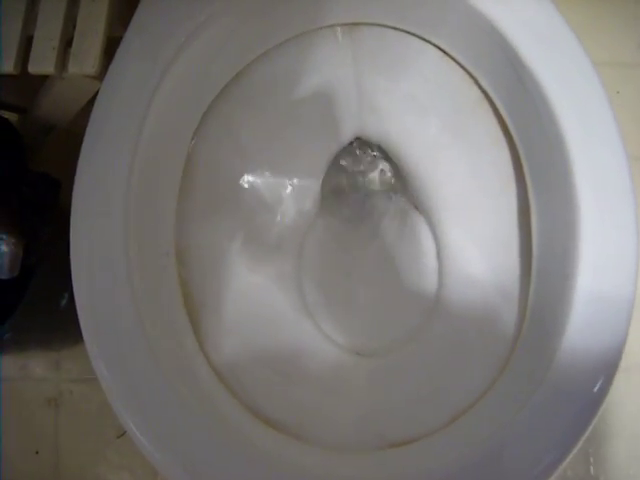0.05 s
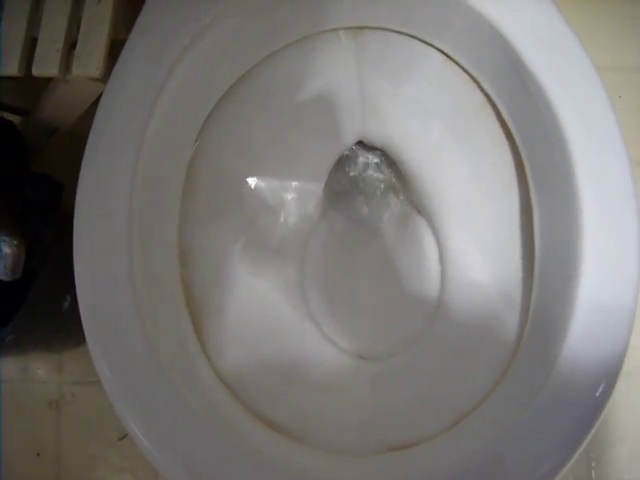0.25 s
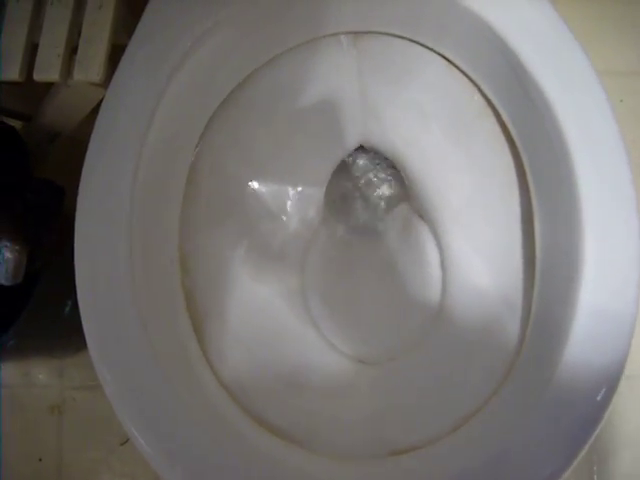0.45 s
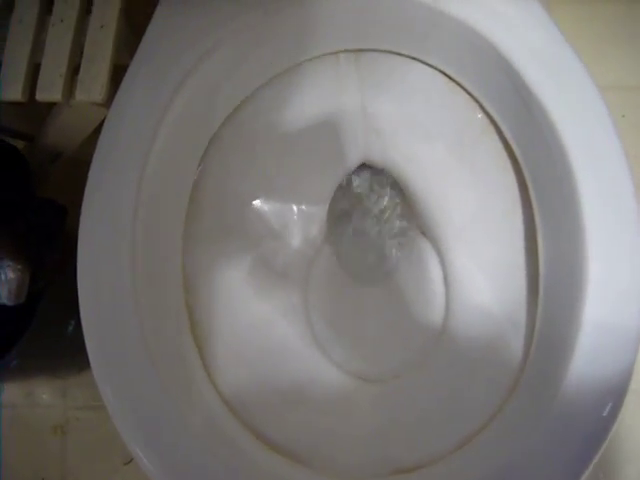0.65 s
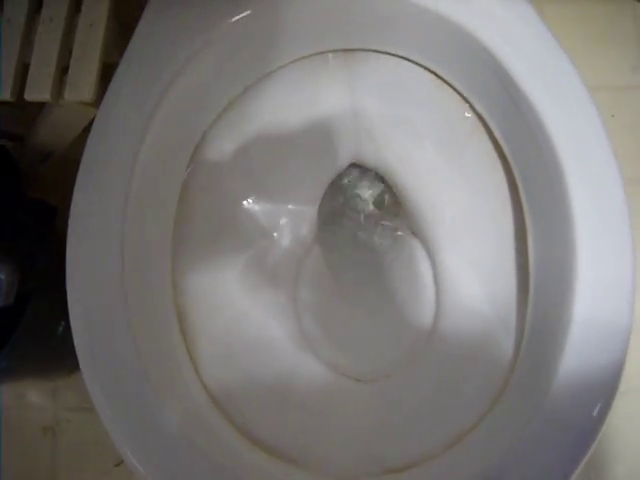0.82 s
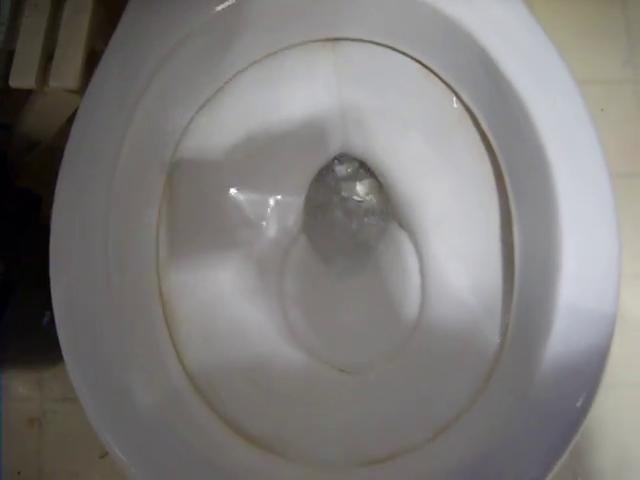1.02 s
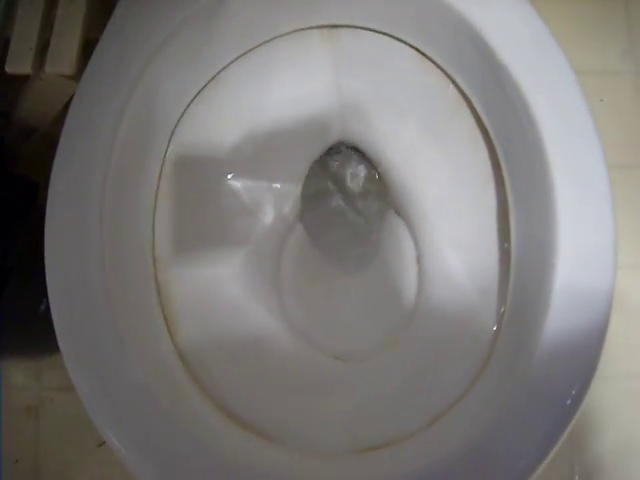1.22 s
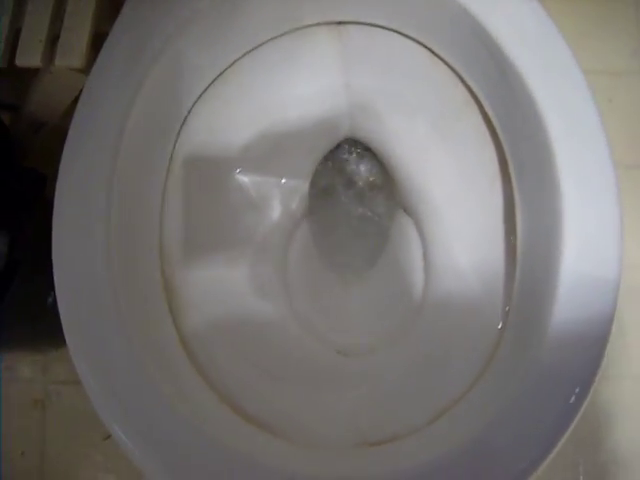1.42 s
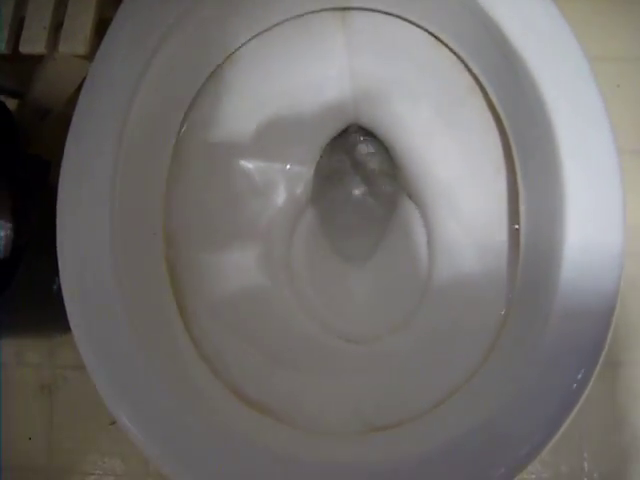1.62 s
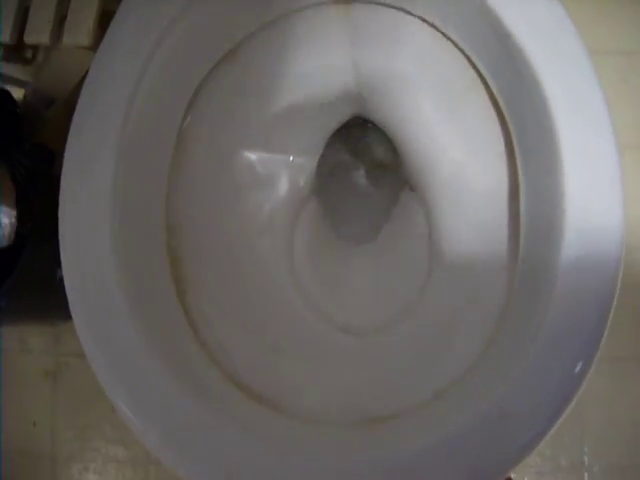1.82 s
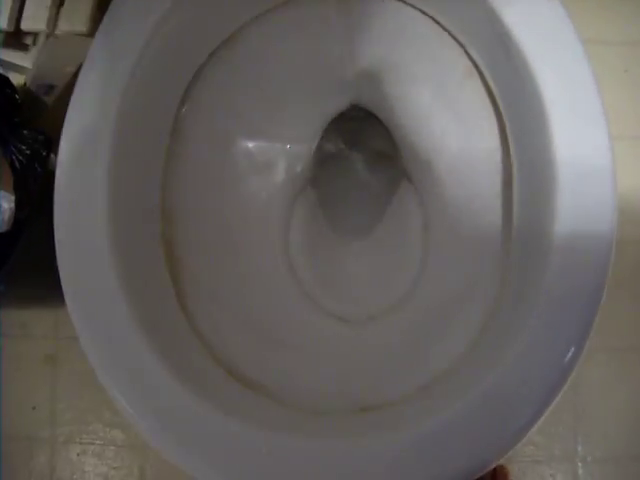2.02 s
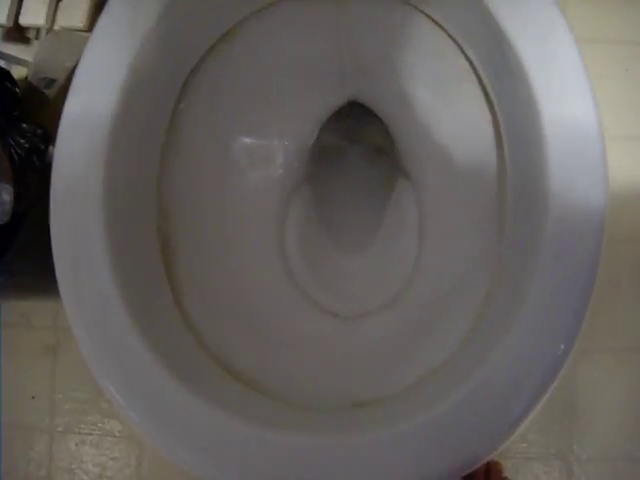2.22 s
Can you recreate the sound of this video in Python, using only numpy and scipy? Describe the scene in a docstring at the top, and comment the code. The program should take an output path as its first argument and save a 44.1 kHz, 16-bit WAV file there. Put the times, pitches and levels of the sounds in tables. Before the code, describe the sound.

Steady hiss of a toilet refilling as the drain glugs, knocks and drips.

```python
"""A toilet tank refilling

In a small bathroom the valve's jet hisses steadily through the air resonances of the hollow tank,
over a faint hum. The last of the flush glugs in the drain as large bubbles ring, and water in the trap
knocks twice, softly and then hard, exciting the bowl's modes. Drips and small bubbles thin out and stop."""
import sys
import numpy as np
from scipy import signal
from scipy.fft import rfft, irfft
from scipy.io import wavfile
from scipy.ndimage import uniform_filter1d

SR = 44100
rng = np.random.default_rng(int(sys.argv[2]) if len(sys.argv) > 2 else 0)


def store_wav(level_fs):
    """Save 16-bit WAV to argv[1]."""
    pcm = np.round(np.clip(np.atleast_2d(level_fs), -1, 1) * 32767)
    wavfile.write(sys.argv[1], SR, pcm.T.astype(np.int16))


N = 103635

# Reverberation of the bathroom. Each row: frequency in Hz, time to fall 60 dB (t60) in seconds.
ROOM_DECAY = [(150, 0.91), (400, 0.26), (1000, 0.38), (3000, 0.09)]
# Spectrum of the valve's jet. Each row: frequency in Hz, relative spectral density in dB.
JET_SPECTRUM = [(20, -12), (45, -15), (78, 1.5), (110, -11.5), (260, -7.5), (390, -1.5), (560, -5.5),
                (820, -0.5), (1010, -3.5), (1120, -7), (1450, -10.5), (1750, -6.5), (2000, -8.5),
                (2900, -4), (3350, -9), (3780, -12), (4000, -28), (4400, -30.5)]
# Air resonances of the tank. Each row: centre in Hz, width in Hz, relative peak density in dB.
TANK_MODES = [(169.4, 32.3, 1.5), (380, 50, -1), (481, 7.2, 9), (781.4, 23, 8.5), (860, 26, 5.5),
              (916, 21, 7.5), (981, 18, 7), (1022, 8, 6.5), (1611, 16, 2.5), (2546, 8.7, 3), (2806, 20, -1),
              (3037, 29, 2)]
# Swell of the tank's strongest, hollow band. Each row: time in seconds, gain in dB.
HOLLOW_SWELL = [(1.24, 0), (1.35, 4), (1.45, 0.5), (1.739, 0), (1.95, -0.7), (2.22, 2), (2.28, -2)]
# Water still running into the bowl. Each row: time in seconds, gain in dB.
TRICKLE_FLOW = [(0, 5), (.06, -1), (.14, -9), (.3, -4.5), (.49, -8.5), (.535, 1.5), (0.621, -3),
                (0.681, -6), (.76, -4), (.98, -8.5), (1.15, -14.5), (1.501, -13), (2.35, -46.5)]
# Colour of that trickle. Each row: bubble pitch in Hz, relative level in dB.
TRICKLE_SPECTRUM = [(200, -20), (550, 5.5), (900, -1), (1450, -2), (2200, -1), (3700, 1), (4300, -40.5)]
# Drips. Each row: start in seconds, pitch in Hz, level in dB, cycles of ringing to fall to 1/e.
DRIPS = [(.0238, 2360, -23.5, 2.6), (.3301, 2274, -33.5, 4.6), (0.5014, 2150, -21.5, 1.8),
         (0.5002, 1100, -25.5, 2.66), (0.5215, 2564, -28.5, 3.1), (.5292, 2095, -29, 4),
         (.571, 2250, -31.5, 4.5), (0.6037, 1900, -34, 4.1), (0.622, 2384, -27, 3.6),
         (0.6329, 2390, -28.5, 4.5), (0.643, 2000, -29.5, 3.8), (.672, 3600, -29.5, 7.6),
         (.6818, 3510, -22.5, 8.5), (0.8415, 2470, -31.5, 3.3), (.862, 3550, -35.5, 15),
         (0.9516, 3100, -33, 8), (0.9663, 2144, -31.5, 9), (1.005, 3590, -34.5, 14), (1.1234, 2115, -30, 7)]
# Large bubbles in the drain. Each row: start in seconds, pitch in Hz, level in dB, rise in seconds,
# t60 in seconds, glide as a share of the pitch per second.
GLUGS = [(0, 215.4, -26, 0.0017, .08, 2), (.018, 561.5, -32.5, 0.0089, 0.15, -1),
         (.032, 229, -33.5, .016, 0.18, 0), (0.06, 79.8, -43, .06, .2, -1),
         (0.195, 210.3, -24, 0.015, 0.28, 0), (.21, 901, -27, 0.0061, 0.089, -0.5),
         (.292, 838, -37, .014, 0.18, 2.5), (.525, 696, -33.5, .0064, 0.12, -2),
         (.555, 583, -34.5, 0.04, 0.21, 0.9), (.592, 536, -26.5, 0.017, .15, -0.95),
         (.675, 529, -37.5, 0.045, 0.088, 3), (.843, 391, -32.5, 0.0089, 0.079, -1.5),
         (0.954, 335.6, -34, 0.023, 0.2, -0.2), (.965, 540, -38.5, .02, .14, -0.5),
         (.96, 911, -36, 0.0059, 0.15, -3.5)]
# Modes of the bowl and trap. Each row: frequency in Hz, relative level in dB, t60 in seconds.
BOWL_MODES = [(230, -24.5, 0.13), (334.7, -25, .16), (370.6, -21, 0.27), (441, -17, 0.043),
              (533.3, -14, 0.079), (544, -21.5, 0.081), (605, -20, 0.26), (663.3, -23.5, 0.33),
              (717.7, -17.5, 0.092), (775, -27, 0.11), (844.7, -19.5, .16), (896.3, -23.5, .23),
              (970, -37, 0.14), (1190, -34.5, 0.19), (1307, -40, 0.14)]
# Blows of water in the trap. Each row: start in seconds, gain in dB, pitch of the thud in Hz.
BLOWS = [(.2252, -7.5, 654), (.2389, -24.5, 730), (0.352, 1.5, 596), (.3676, 7, 662), (.385, -7.5, 760),
         (0.4033, -24, 860), (0.6052, -26.5, 632)]

HUM_HZ, HUM_DB = 29.2, -56
HISS_DB, HISS_PATCH_DB, HISS_FLICKER_DB, HOLLOW_HZ = -41.5, 0.53, 0.5, (680, 1150)
TRICKLE_DB, TRICKLE_PER_S, TRICKLE_SPREAD_DB = -41.5, 2200, 3
DRIP_RISE_S, DRIP_GLIDE_PER_S, SPLASH_DB, SPLASH_S = 0.00071, 6.9, -15, 0.0018
SLOSH_AT_S, SLOSH_WIDTH_S, SLOSH_DB = 0.3835, 0.0079, -33.5
THUD_RISE_S, THUD_DB, BOWL_CUTOFF_HZ = 0.0013, -5.5, 193
KNOCK_WET_DB, GLUG_WET_DB, DRIP_WET_DB = -14.5, -12, -7
OVERLOAD, FULL_SCALE, NARROW_HZ, TOP_HZ = 0.73, 0.71, 4400, 15800


def amp(db):
    """Amplitude grows tenfold with every 20 dB."""
    return 10 ** (np.asarray(db) / 20)


def unit_rms(x):
    """Division by the rms gives a signal unit power."""
    return x / np.sqrt(np.mean(x ** 2) + 1e-20)


def curve_at(points, hz):
    """Interpolation on a log-frequency axis reads a table at any frequency."""
    f, value = np.transpose(points)
    return np.interp(np.log(hz + 1), np.log(f + 1), value)


def add(mix, start_s, sound):
    """Superposition: a sound adds to the mix from its start time."""
    part = mix[max(round(start_s * SR), 0):][:len(sound)]
    part += sound[:len(part)]


def bubble(hz, rise_s, t60, glide):
    """A pocket of air is a damped oscillator: it swells, then decays, as its pitch glides."""
    t = np.arange(0, rise_s + t60, 1 / SR)
    swell = np.sin(np.pi / 2 * np.minimum(t / rise_s, 1)) ** 2
    fade = np.exp(-np.log(1000) * np.maximum(t - rise_s, 0) / t60)
    return swell * fade * np.sin(2 * np.pi * hz * (t + glide * t ** 2 / 2))


def spray(size):
    """Fine droplets add incoherently into a bright band of noise."""
    band = signal.butter(2, [1200, 3300], "band", fs=SR, output="sos")
    return unit_rms(signal.sosfilt(band, rng.standard_normal(size)))


def room(x, wet_db):
    """Reverberation: reflections from the tiles form a tail, each band decaying at its own rate."""
    hz, t, noise = signal.stft(rng.standard_normal(SR // 2), SR, nperseg=256)
    decay = np.exp(-np.log(1000) * t / curve_at(ROOM_DECAY, hz)[:, None])
    tail = signal.istft(noise * decay, SR, nperseg=256)[1]
    tail *= np.minimum(np.arange(len(tail)) / SR / 0.0024, 1)
    return x + amp(wet_db) * signal.fftconvolve(x, tail / np.linalg.norm(tail))[:N]


def hum():
    """A pure tone of low frequency is heard as a faint, steady hum."""
    return amp(HUM_DB) * np.sqrt(2) * np.sin(2 * np.pi * HUM_HZ * np.arange(N) / SR)


def valve():
    """Cavity resonance: the tank colours the jet's restless noise, and its hollow band swells and sinks."""
    _, _, noise = signal.stft(rng.standard_normal(N), SR, nperseg=512)
    patches = uniform_filter1d(rng.standard_normal(noise.shape), size=8, axis=0)  # smooth in frequency
    patches = unit_rms(uniform_filter1d(patches, size=7, axis=1))  # and in time
    flicker = unit_rms(uniform_filter1d(rng.standard_normal(noise.shape[1]), size=4))
    unrest = amp(HISS_PATCH_DB * patches + HISS_FLICKER_DB * flicker)
    jet = signal.istft(noise * unrest, SR, nperseg=512)[1][:N]
    f = np.fft.rfftfreq(N, 1 / SR)
    resonances = sum(amp(db) ** 2 / (1 + ((f - hz) / width) ** 2) ** 2 for hz, width, db in TANK_MODES)
    power = amp(curve_at(JET_SPECTRUM, f)) ** 2 + resonances
    hiss = unit_rms(irfft(rfft(jet) * np.sqrt(power), N))
    hollow = signal.sosfiltfilt(signal.butter(2, HOLLOW_HZ, "band", fs=SR, output="sos"), hiss)
    swell = amp(np.interp(np.arange(N) / SR, *np.transpose(HOLLOW_SWELL)))
    return amp(HISS_DB) * (hiss + (swell - 1) * hollow)


def trickle(pitches=40):
    """Small bubbles ring at random times, a Poisson process; the swarm fades as the bowl settles."""
    swarm = np.zeros(N)
    for hz in np.geomspace(260, 4100, pitches) * rng.uniform(0.927, 1.03, pitches):
        strengths = amp(TRICKLE_SPREAD_DB * np.minimum(rng.exponential(1, N), 4))
        births = rng.random(N) < TRICKLE_PER_S / pitches / SR
        ring = bubble(hz, DRIP_RISE_S, t60=28 / hz, glide=3.2)
        bubbles = signal.oaconvolve(strengths * births, ring)[:N]
        swarm += amp(curve_at(TRICKLE_SPECTRUM, hz)) * unit_rms(bubbles)
    flow_db = np.interp(np.arange(N) / SR, *np.transpose(TRICKLE_FLOW))
    return amp(TRICKLE_DB + flow_db) * unit_rms(swarm)


def drips():
    """Air entrainment: each drip makes a tiny splash and a small bubble that rings with rising pitch."""
    out, t = np.zeros(N), np.arange(SR // 20) / SR
    for start_s, hz, db, cycles in DRIPS:
        t60 = np.log(1000) * cycles / hz
        add(out, start_s, amp(db) * bubble(hz, DRIP_RISE_S, t60, DRIP_GLIDE_PER_S))
        add(out, start_s, amp(db + SPLASH_DB) * spray(len(t)) * np.exp(-t / SPLASH_S))
    return out


def slosh():
    """The hard blow throws up a short spray: droplet noise under a Gaussian envelope."""
    envelope = np.exp(-((np.arange(N) / SR - SLOSH_AT_S) / SLOSH_WIDTH_S) ** 2)
    return amp(SLOSH_DB) * spray(N) * envelope


def glugs():
    """Bubble resonance: large bubbles break loose in the drain, sliding in pitch as they change shape."""
    out = np.zeros(N)
    for start_s, hz, db, rise_s, t60, glide in GLUGS:
        add(out, start_s, amp(db) * bubble(hz, rise_s, t60, glide))
    return out


def knocks():
    """Impact excitation: each dull thud sets the bowl's modes ringing; the bowl radiates little bass."""
    out, t = np.zeros(N), np.arange(SR // 2) / SR
    ring = sum(amp(db) * np.exp(-np.log(1000) * t / t60) * np.sin(2 * np.pi * hz * t)
               for hz, db, t60 in BOWL_MODES)
    ring *= 1 - np.exp(-(t / THUD_RISE_S) ** 2)
    push = (t / THUD_RISE_S) ** 2 * np.exp(2 - 2 * t / THUD_RISE_S)
    for start_s, db, hz in BLOWS:
        thud = amp(THUD_DB) * push * np.sin(2 * np.pi * hz * t)
        add(out, start_s, -amp(db) * (ring + thud))
    return signal.sosfilt(signal.butter(3, BOWL_CUTOFF_HZ, "high", fs=SR, output="sos"), out)


def scene():
    """Tank, drain and bowl superpose just above the seat; the water sounds reverberate in the room."""
    water = room(knocks(), KNOCK_WET_DB) + room(glugs(), GLUG_WET_DB)
    water += room(drips() + slosh() + trickle(), DRIP_WET_DB)
    return (valve() + hum() + water)[None]


def record(dry):
    """Clipping: the hardest blow overloads the microphone; low-passed, it clips again with a thin click."""
    narrow_lowpass = signal.firwin(511, NARROW_HZ, window=("kaiser", 9), fs=SR)[None]
    top_lowpass = signal.firwin(511, TOP_HZ, window=("kaiser", 9), fs=SR)[None]
    overloaded = np.clip(dry, -OVERLOAD, OVERLOAD)
    narrow = signal.oaconvolve(overloaded, narrow_lowpass, "same")
    clipped = np.clip(narrow, -FULL_SCALE, FULL_SCALE)
    return signal.oaconvolve(clipped, top_lowpass, "same")


dry = scene()
out = record(dry)
store_wav(out)
```